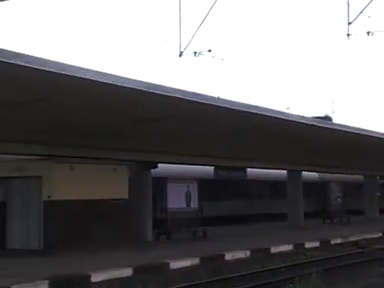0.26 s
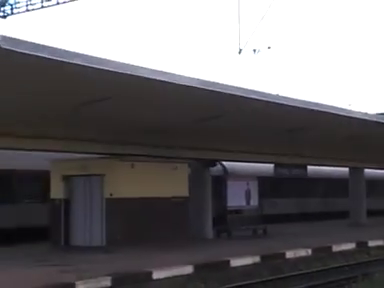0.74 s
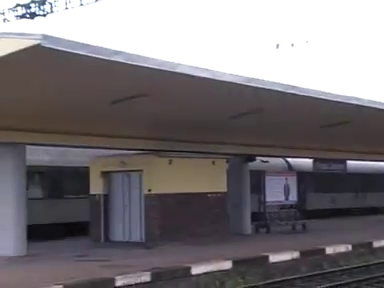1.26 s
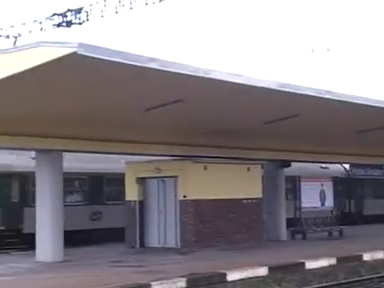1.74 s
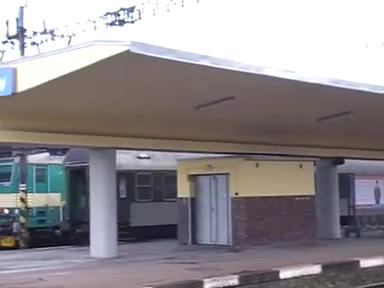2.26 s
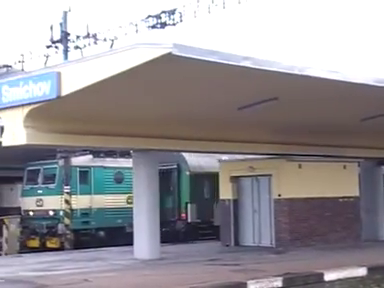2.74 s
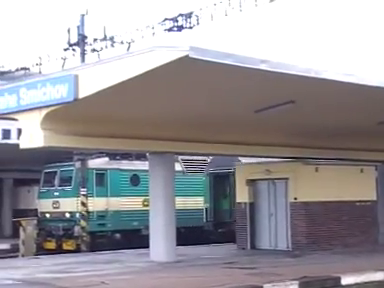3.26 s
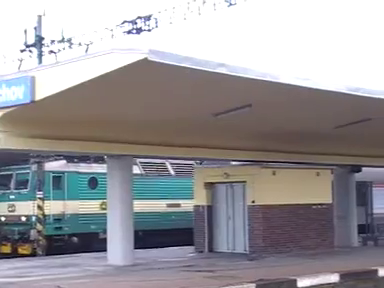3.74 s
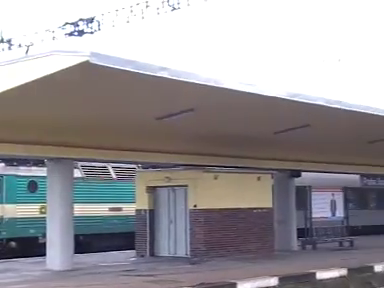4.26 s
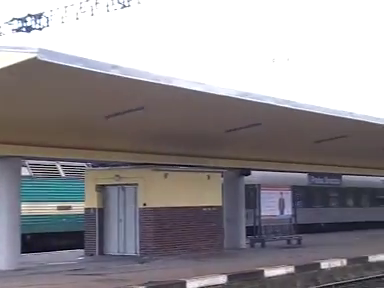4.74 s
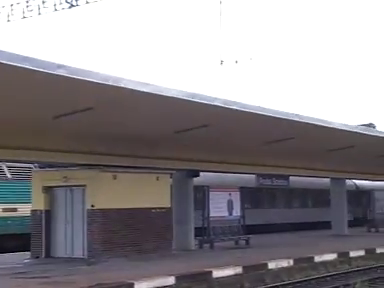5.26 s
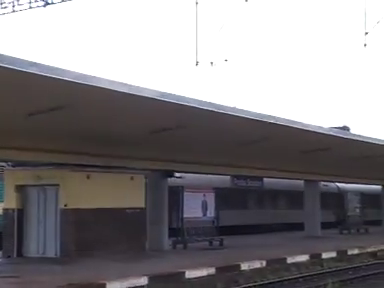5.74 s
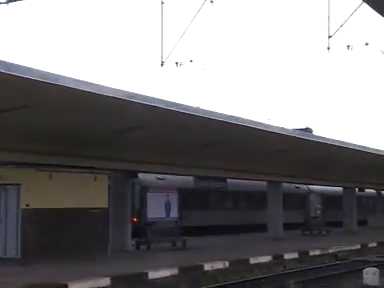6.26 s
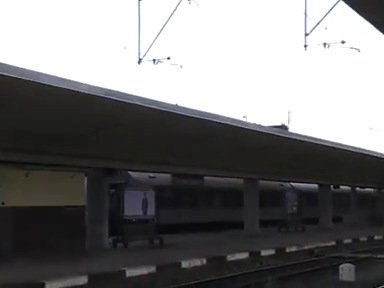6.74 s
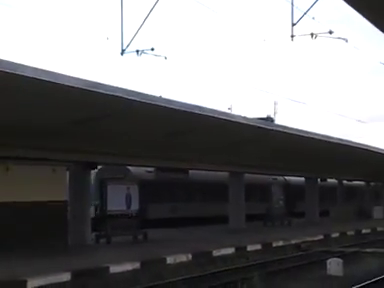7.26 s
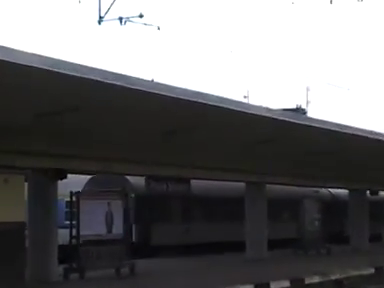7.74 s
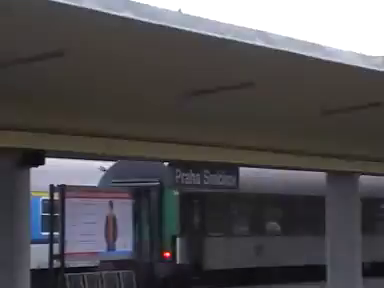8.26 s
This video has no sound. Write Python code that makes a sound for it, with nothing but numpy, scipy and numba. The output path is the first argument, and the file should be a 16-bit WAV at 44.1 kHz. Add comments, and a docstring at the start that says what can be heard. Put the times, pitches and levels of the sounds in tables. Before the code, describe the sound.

Passenger train coaches brake past a station platform, wheels squealing in piercing high tones over a rolling rumble and soft thuds.

```python
"""A station platform, heard from across the tracks: passenger coaches brake as they roll away.
Rough treads rumble and roar, wheels thud over rail joints, brake blocks hiss and a machine on board hums.
Above that, braked wheels sing at their high modes: each tone arrives directly and as a blur of
Doppler-shifted echoes from canopy and walls. The recorder's gain ducks on the peaks."""
import sys
import numpy as np
from scipy import signal
from scipy.fft import rfft, irfft, next_fast_len
from scipy.io import wavfile
from scipy.ndimage import uniform_filter1d
from numba import njit

SR = 44100
rng = np.random.default_rng(int(sys.argv[2]) if len(sys.argv) > 2 else 0)


def generate_wav(signal):
    """Clip the signal to [-1, 1] and save it as 16-bit WAV at the path in sys.argv[1]."""
    frames = np.transpose(np.atleast_2d(signal))
    scaled = np.clip(frames, -1, 1) * 32767
    pcm = np.round(scaled).astype(np.int16)
    wavfile.write(sys.argv[1], SR, pcm)


N = 374403
TIME = np.arange(N) / SR
LEFT_RIGHT = np.array([[1], [-1]])


def undb(db):
    """Decibels to gain."""
    return 10 ** (np.asarray(db) / 20)


def unit(x):
    """Scale to rms 1."""
    return x / np.sqrt(np.mean(np.abs(x) ** 2))


def curves(table):
    """Columns of a table, interpolated over TIME; the first holds the seconds."""
    times_s, *columns = np.transpose(table)
    return [np.interp(TIME, times_s, column) for column in columns]


def walk(t, rate_hz):
    """Smooth random drift, rms 1."""
    steps = np.interp((t - t[0]) * rate_hz, np.arange(2048), rng.standard_normal(2048))
    return unit(uniform_filter1d(steps, max(int(SR / rate_hz / 2), 1)))


def pan(db):
    """Stereo gains for a left-minus-right level."""
    gains = undb(LEFT_RIGHT * db / 2)
    return gains / np.sqrt(np.mean(gains ** 2, axis=0))


def widen(mid, side, side_db):
    """Mid and side to stereo, rms 1."""
    return unit(mid + undb(side_db) * side * LEFT_RIGHT)


def add(out, sound, t):
    """Mix a sound in at its times t."""
    first = int(round(t[0] * SR))
    out[:, first:first + len(t)] += sound


def noise(spectrum, side_db):
    """Stereo noise, rms 1. Each spectrum row: frequency in Hz, relative density in dB."""
    size = next_fast_len(N)
    hz, db = np.transpose(spectrum)
    bins_hz = np.fft.rfftfreq(size, 1 / SR)
    gain = undb(np.interp(np.log(bins_hz + 1), np.log(hz), db))
    mid, side = irfft(rfft(rng.standard_normal((2, size))) * gain, size)[:, :N]
    return widen(mid, side, side_db)


def echoes(count, spread_hz, below_hz, above_hz, steepness, tilt_db, side_db, reach_hz=1500):
    """Complex echo envelope: Doppler shifts fill a band above the tone, uneven friction adds skirts."""
    size = next_fast_len(count)
    shift_hz = np.fft.fftfreq(size, 1 / SR)
    inside_hz = np.clip(shift_hz, 0, spread_hz)
    outside_hz = shift_hz - inside_hz
    skirt_hz = np.where(shift_hz < 0, below_hz, above_hz)
    skirt = (1 + (outside_hz / skirt_hz) ** 2) ** (-steepness / 2)
    gain = undb(tilt_db * inside_hz / spread_hz) * skirt * np.exp(-(outside_hz / reach_hz) ** 2)
    paths = rng.standard_normal((2, size)) + 1j * rng.standard_normal((2, size))
    mid, side = np.fft.ifft(paths * gain)[:, :count]
    return widen(mid, side, side_db)


# One row: centre in Hz, width in Hz, base level in dB.
HUM_BAND = (259, 9, -49.5)

def machine_hum():
    """A machine on the train hums, fading as its coach draws away."""
    hz, width_hz, db = HUM_BAND
    blur = echoes(N, width_hz, below_hz=3.7, above_hz=4.2, steepness=2.5, tilt_db=-9, side_db=-18.5)
    hum = unit(np.real(blur * np.exp(2j * np.pi * (hz - width_hz / 2) * TIME)))
    leaving_db = np.interp(TIME, [1.5, 6.9, 7.6], [3, -1, -7])
    return undb(db + leaving_db) * hum


# Each row: time in seconds, roar in dB, rumble in dB before trim.
ROLLING_LEVELS = [(0, -28.5, -32.5), (0.17, -28, -31.5), (0.4, -31, -37.5), (0.62, -31.5, -41),
                  (0.92, -31.5, -37.5), (1.55, -31.5, -36), (1.92, -34.5, -42.5), (2.2, -33, -39.5),
                  (2.65, -32.5, -37.5), (3.0, -33, -37), (3.3, -31, -35), (4.33, -35, -39),
                  (4.6, -39.5, -43.5), (5.1, -35, -38.5), (5.5, -38, -43.5), (6.0, -37, -42.5),
                  (6.55, -34, -38.5), (7.0, -34.5, -39.5), (7.35, -39, -44.5), (7.8, -35.5, -37.5),
                  (8.49, -35, -39)]
# Each row: frequency in Hz, relative density in dB.
RUMBLE_SPECTRUM = [(20, -28), (40, -16.5), (70, -4), (100, -1), (150, 0), (210, -2), (300, -8.5),
                   (450, -21), (1000, -67.5)]
ROAR_SPECTRUM = [(100, -24), (250, -14), (380, -0.5), (500, -1.5), (660, 1), (1000, 1.5), (1400, -1.5),
                 (2300, -3.5), (2900, -8.5), (3600, -17), (6000, -19.5), (12000, -59.5)]

def rolling(rumble_trim_db=-0.64):
    """Rough treads shake the coach bodies (rumble) and ring wheels and rails (roar)."""
    roar_db, rumble_db = curves(ROLLING_LEVELS)
    rattle_db = 0.38 * walk(TIME, rate_hz=22)
    rumble = undb(rumble_db + rumble_trim_db + rattle_db) * noise(RUMBLE_SPECTRUM, side_db=-20.5)
    roar = undb(roar_db + rattle_db) * pan(db=1) * noise(ROAR_SPECTRUM, side_db=-14.5)
    return rumble + roar


def grip(full_s, until_s, rise_db_per_s, fade_db_per_s):
    """Gain of one brake block's grip: swells, holds at 1, fades."""
    before_s = np.maximum(full_s - TIME, 0)
    after_s = np.maximum(TIME - until_s, 0)
    return undb(-rise_db_per_s * before_s - fade_db_per_s * after_s)


# Each row: hold start and end in seconds, rise and fade in dB/s, level against the roar in dB.
BLOCK_RUBS = [(0, 0.96, 0, 24, 1), (2.6, 7.16, 1.5, 10, -7.5), (5.1, 6.15, 20, 15, -6)]
# Each row: frequency in Hz, relative density in dB.
HISS_SPECTRUM = [(1000, -12.5), (2800, 4.5), (4000, 3), (5400, 1), (6600, 3.5), (8200, 2.5), (10200, 5),
                 (11000, -15), (12000, -39.5)]

def brake_hiss():
    """Blocks rub on the treads, in step with the roar; a near one lets go early, the others rub on."""
    roar_db, _ = curves(ROLLING_LEVELS)
    rubbing = np.sqrt(sum((undb(db) * grip(*shape)) ** 2 for *shape, db in BLOCK_RUBS))
    flicker_db = 0.6 * walk(TIME, rate_hz=30)
    return rubbing * undb(roar_db + flicker_db) * noise(HISS_SPECTRUM, side_db=-7.5)


def knock(start_s, decay_s, rise_s=0.0078):
    """Gain of one blow: linear rise, exponential decay."""
    age_s = np.maximum(TIME - start_s, 0)
    return np.minimum(age_s / rise_s, 1) * np.exp(-np.maximum(age_s - rise_s, 0) / decay_s)


# Each row: start in seconds, thud in dB, clank in dB.
JOINT_HITS = [(.14, -36, -26.5), (0.931, -35, -31.5), (2.124, -26, -34), (2.61, -30, -37), (2.69, -37, -34),
              (2.8, -44, -37), (3.15, -29.5, -30), (3.42, -37, -29), (3.601, -28.5, -37), (3.768, -30, -35),
              (4.291, -42, -38), (5.87, -41, -34), (6.468, -35, -38), (6.87, -36, -44), (7.78, -44, -35)]
# Each row: frequency in Hz, relative density in dB.
THUD_SPECTRUM = [(40, -28), (100, -7), (170, 7.5), (260, -14), (700, -10), (2500, -14.5), (6000, -44.5)]
# Each row: centre in Hz, width in Hz, relative level in dB.
BOGIE_MODES = [(676, 140, 3.5), (1020, 86, -1), (1450, 240, -4), (2290, 620, -6.5)]

def rail_joints(clank_cutoff_hz=3000):
    """Wheels drop over rail joints: a dull thud and a soft bogie clank, smeared by the canopy."""
    thuds = sum(undb(db) * knock(start_s, decay_s=0.048) for start_s, db, _ in JOINT_HITS)
    clanks = sum(undb(db) * knock(start_s, decay_s=0.036) for start_s, _, db in JOINT_HITS)
    hz = np.geomspace(100, 12000, 300)
    power = sum(undb(db) ** 2 / (1 + ((hz / centre_hz - centre_hz / hz) * centre_hz / width_hz) ** 2)
                for centre_hz, width_hz, db in BOGIE_MODES)
    power /= 1 + (hz / clank_cutoff_hz) ** 6
    clank_spectrum = np.column_stack([hz, 10 * np.log10(power)])
    return thuds * noise(THUD_SPECTRUM, side_db=-24) + clanks * noise(clank_spectrum, side_db=-14.5)


# Each row: start in seconds, pitch in Hz, peak level in dB.
HIGH_TICKS = [(1.72, 10100, -29), (2.435, 9860, -20), (3.172, 9780, -22), (8.08, 9700, -31)]

def high_ticks(length_s=0.011, sweep=0.037):
    """Brief high ticks near 10 kHz, each a tiny falling chirp."""
    out = np.zeros((2, N))
    for start_s, hz, db in HIGH_TICKS:
        t = TIME[(TIME > start_s) & (TIME < start_s + length_s)]
        progress = (t - start_s) / length_s
        falling_hz = hz * (1 + sweep * (1 - 2 * progress))
        phase = 2 * np.pi * np.cumsum(falling_hz) / SR
        add(out, undb(db) * np.sin(np.pi * progress) ** 2 * np.sin(phase), t)
    return out


DOPPLER_SPREAD = 0.017  # echoes from ahead lie up to this fraction above the receding direct tone

def wheel_mode(t, hz, direct, scattered, flutter_db, wobble_hz=1.83, ramp_s=0.004):
    """A mode kept ringing by the block: a wavering sine plus echoes, both fluttering with the grip."""
    phase = 2 * np.pi * np.cumsum(hz + wobble_hz * walk(t, rate_hz=24.84)) / SR
    fading_db = 1.17 * walk(t, rate_hz=12)
    envelope = (direct * undb(fading_db) + scattered) * undb(flutter_db * walk(t, rate_hz=16))
    ramps = np.clip(np.minimum(t - t[0], t[-1] - t) / ramp_s, 0, 1)
    return np.sqrt(2) * ramps * np.real(envelope * np.exp(1j * phase))


# Each row: start, peak and end in seconds, pitch in Hz, echo level in dB, direct against echoes in dB.
FAR_WHEELS = [(-.3, .03, .35, 3816, -42, -1), (.5, .57, 1.2, 3816, -41.5, -3),
              (-.9, .15, 1.1, 6170, -40, -6), (.6, 1.17, 1.5, 6170, -41, -4),
              (1.35, 1.66, 2.2, 6170, -40, -4), (.45, .92, 1.1, 8015, -35.5, -8),
              (0, .6, 1.1, 3300, -42, -12), (.3, 1.2, 2.3, 9214, -27, 4), (1.3, 1.78, 2, 10880, -45, -15),
              (1.8, 2.8, 3.6, 6150, -48, -6), (2.55, 2.85, 3.15, 10900, -42, -15),
              (2.9, 3.5, 4.1, 4868, -41, -4), (4.05, 4.3, 4.45, 4765, -48, -5),
              (4.1, 4.8, 5.8, 4875, -49.5, -6), (4.5, 4.8, 5.5, 4555, -45.5, -8),
              (4.9, 5.5, 6.35, 4555, -40.5, -5), (4.95, 5.42, 5.9, 3350, -46.5, -4),
              (4.55, 4.67, 4.9, 6110, -55, 0), (5.1, 5.6, 7.3, 6130, -46.5, -4),
              (5.6, 5.87, 6.05, 6130, -43.5, -2), (5.7, 5.85, 6.2, 4872, -46, -2),
              (5.8, 6.55, 7.3, 4872, -38.5, -2), (6.7, 7.2, 8.3, 4872, -46.5, -5),
              (5.8, 6.25, 7.4, 5657, -48, -4), (5.4, 6.55, 7.4, 10093, -35, -12),
              (6.9, 7.8, 9.4, 6115, -45.5, 0), (7.45, 7.68, 8.3, 5285, -47.5, -4),
              (7.35, 7.68, 8.2, 6640, -47, -6), (6.9, 7.9, 9.1, 11930, -53.5, -15)]

def far_squeals():
    """Wheels further along the train swell and die away, heard largely through their echoes; one row near 9.2
    kHz is instead a second, clearer tone of the first whistle."""
    out = np.zeros((2, N))
    for start_s, peak_s, end_s, hz, db, direct_db in FAR_WHEELS:
        t = TIME[(TIME > start_s) & (TIME < end_s)]
        swell = np.sin(np.interp(t, [start_s, peak_s, end_s], [0, np.pi / 2, np.pi])) ** 2
        pan_db = np.interp(peak_s, [0, 3], [2, -1.5])  # left to right
        blur = echoes(len(t), DOPPLER_SPREAD * hz, below_hz=0.0093 * hz, above_hz=0.008 * hz,
                      steepness=1.9, tilt_db=-7.5, side_db=-8.5)
        tone = wheel_mode(t, hz, undb(direct_db), blur, flutter_db=0.96)
        add(out, undb(db) * pan(pan_db) * swell * tone, t)
    return out


def turns(t, start_turns_per_s=2.71, braking_turns_per_s2=0.12):
    """Turns made by a steadily braked wheel."""
    return start_turns_per_s * t - braking_turns_per_s2 * t ** 2 / 2


# Each row: wheel, hold start and end in seconds, rise and fade in dB/s, direct and echo dB before trim.
BLOCK_GRIPS = [("first whistle", 1, 4.38, 3.1, 16.4, -15, -15.5),
               ("first whistle", 4, 6.26, 7.6, 28, -31, -24.5),
               ("second whistle", 2.95, 4.33, 44, 11, -25, -22.5),
               ("second whistle", 5.01, 6.05, 14.4, 14.3, -15.5, -16),
               ("second whistle", 6.6, 6.66, 19, 33, -16, -17.5),
               ("last whistle", 6.95, 7.25, 40, 60, -33, -33.5),
               ("last whistle", 7.71, 8.24, 43, 4.4, -22.5, -23),
               ("upper shriek", 5.86, 6.2, 26, 9, -28.5, -31),
               ("upper shriek", 6.25, 6.6, 14.6, 9, -24, -21.5),
               ("upper shriek", 6.9, 7.34, 25, 23, -13, -18.5),
               ("upper shriek", 7.7, 7.75, 11, 6.1, -26.5, -21),
               ("lower shriek", 6.33, 7.1, 12.7, 9, -34.5, -33.5),
               ("lower shriek", 7.3, 7.45, 62, 9, -22.5, -33),
               ("lower shriek", 7.67, 7.93, 16, 16.4, -23, -23),
               ("low squeal", 0.24, 0.66, 14, 21.7, -25, -23), ("low squeal", 0.95, 1, 44, 79, -26, -23.5),
               ("low squeal", 1.13, 1.58, 18, 52, -37, -32),
               ("low squeal", 2.61, 2.95, 22, 22, -47.5, -35.5),
               ("lowest squeal", 0.84, 0.99, 40, 85, -34.5, -34),
               ("lowest squeal", 1.17, 1.27, 40, 40, -40, -44)]
# Each wheel: pitch in Hz, time of that pitch in seconds, glide in Hz/s.
WHEEL_PITCHES = {"first whistle": (9167, 2.7, -6), "second whistle": (9114, 5.6, 6),
                 "last whistle": (9018, 7.8, 4), "upper shriek": (8056, 7, 5),
                 "lower shriek": (7049, 7.6, 3), "low squeal": (4754, .5, 2),
                 "lowest squeal": (3268, .9, 15)}
# Each wheel: lower and upper echo skirt in Hz, skirt steepness, tilt in dB, side level in dB.
WHEEL_ECHOES = {"first whistle": (40, 59, 1.33, -10.5, -11), "second whistle": (47, 42.5, 1.52, -5.5, -3.5),
                "last whistle": (82.5, 72, 1.8, -9, -5), "upper shriek": (37.5, 70, 1.5, -8, -7),
                "lower shriek": (32, 37.5, 1.5, -5.5, -9.5), "low squeal": (64.5, 83, 1.6, -2, -9.5),
                "lowest squeal": (28, 56, 2, -1.5, -13)}
# Each wheel: time of one crest in seconds, throb depth in dB.
WHEEL_THROBS = {"first whistle": (1.57, 0.51), "second whistle": (5.57, 1.8), "last whistle": (7.5, 1),
                "upper shriek": (6.95, 1.5), "lower shriek": (7.33, 2.2), "low squeal": (0.6, 1.9),
                "lowest squeal": (0.67, 1)}
# Lower tones stay in place. Each wheel: left minus right in dB, left phase lead in radians.
STEADY_BEARINGS = {"upper shriek": (1, -.1), "lower shriek": (-.6, .2), "low squeal": (-1, 0),
                   "lowest squeal": (1, 0)}
# The listener turns, so the whistles' bearing shifts. Each row: time in seconds, left minus right in dB, left
# phase lead in radians.
WHISTLE_BEARINGS = [(0, 1, 1.3), (.7, -0.5, 1.58), (1.7, 5, 0.74), (2.3, 5, 0.75), (3.1, 1, -0.4),
                    (4.6, 1.5, -0.78), (5.6, 1, 0.04), (8.49, 0, -0.41)]

def squeal(wheel, direct_trim_db=-0.2, echo_trim_db=0.04):
    """A braked wheel sings: it follows its firmest grip; the direct tone throbs once per turn."""
    grips = [undb([[direct_db + direct_trim_db], [echo_db + echo_trim_db]]) * grip(*shape)
             for name, *shape, direct_db, echo_db in BLOCK_GRIPS if name == wheel]
    direct, echo = np.max(grips, axis=0)
    crest_s, depth_db = WHEEL_THROBS[wheel]
    throb = undb(depth_db * np.cos(2 * np.pi * (turns(TIME) - turns(crest_s))))
    hz, at_s, glide_hz_per_s = WHEEL_PITCHES[wheel]
    gliding_hz = hz + glide_hz_per_s * (TIME - at_s)  # the wheel draws away and slows
    pan_db, lead_rad = STEADY_BEARINGS[wheel] if wheel in STEADY_BEARINGS else curves(WHISTLE_BEARINGS)
    ports = np.exp(1j * LEFT_RIGHT * lead_rad / 2)  # the wave reaches one microphone port first
    blur = echoes(N, DOPPLER_SPREAD * hz, *WHEEL_ECHOES[wheel])
    tone = wheel_mode(TIME, gliding_hz, direct * throb * ports, echo * ports * blur, flutter_db=0.97)
    return pan(pan_db) * tone


def scene():
    """Squeals over the rolling train."""
    squeals = sum(squeal(wheel) for wheel in WHEEL_PITCHES) + far_squeals()
    return squeals + high_ticks() + rolling() + machine_hum() + rail_joints() + brake_hiss()


@njit
def follow_peaks(x, attack_s, release_s):
    """One-pole peak follower."""
    out, level = np.empty(len(x)), 0.
    for i in range(len(x)):
        level += (x[i] - level) / (SR * (attack_s if x[i] > level else release_s))
        out[i] = level
    return out


def record(dry, threshold_db=-5, gain_db=0.74, cutoff_hz=12250):
    """The recorder ducks its gain on the loudest peaks and cuts the top."""
    peak = follow_peaks(np.abs(dry).max(axis=0), attack_s=0.00043, release_s=0.13)
    limited = dry * undb(gain_db) / np.maximum(peak / undb(threshold_db), 1)
    lowpass = signal.ellip(8, 0.2, 70, cutoff_hz, fs=SR, output="sos")
    return signal.sosfilt(lowpass, limited)


dry = scene()
out = record(dry)
generate_wav(out)
```